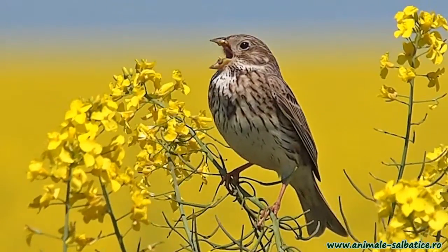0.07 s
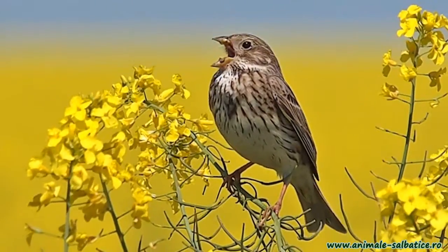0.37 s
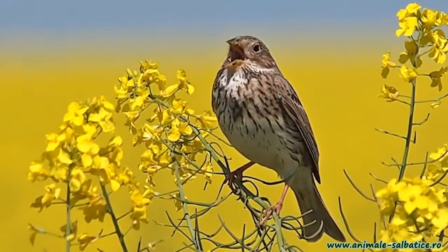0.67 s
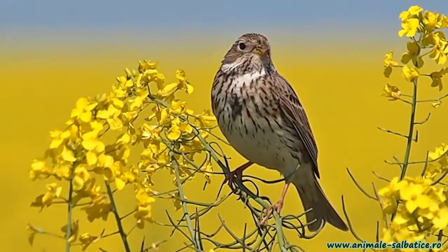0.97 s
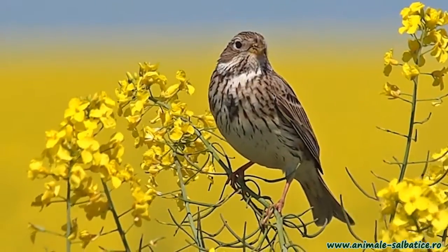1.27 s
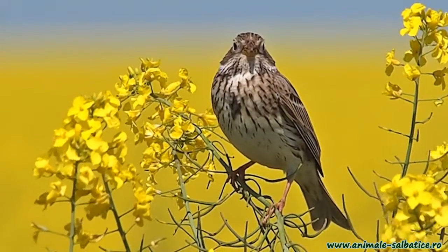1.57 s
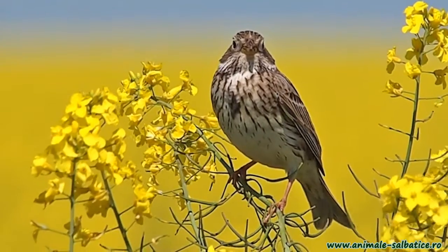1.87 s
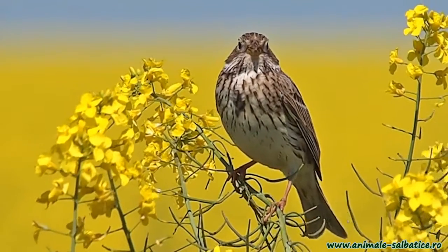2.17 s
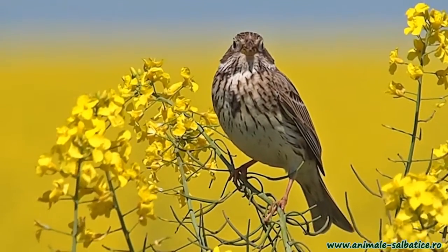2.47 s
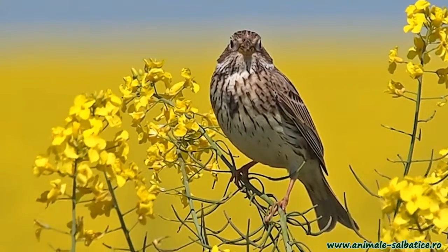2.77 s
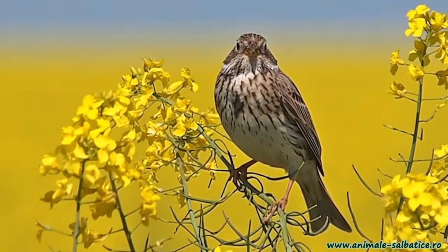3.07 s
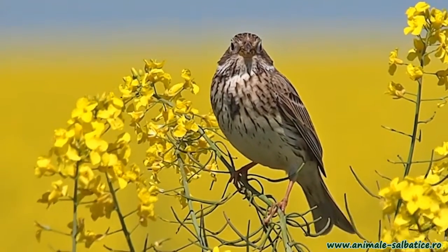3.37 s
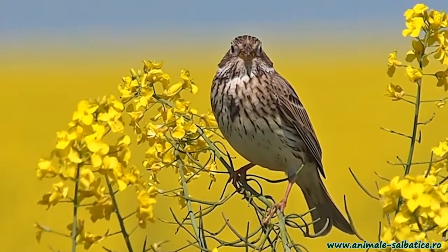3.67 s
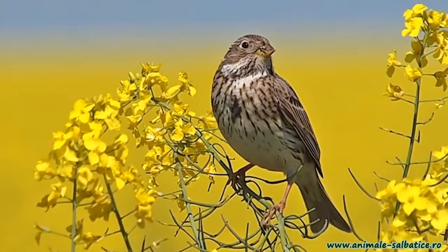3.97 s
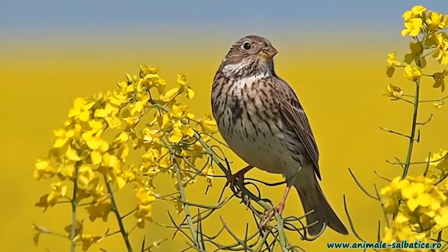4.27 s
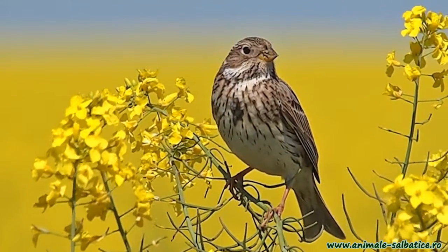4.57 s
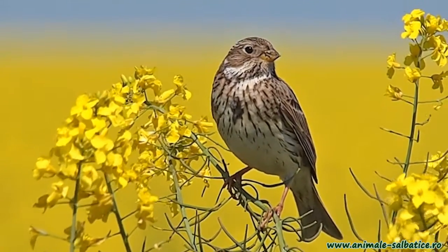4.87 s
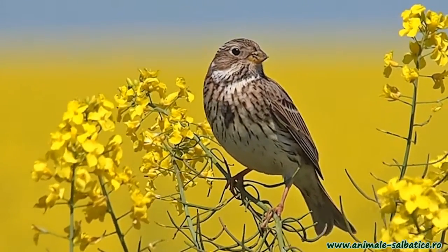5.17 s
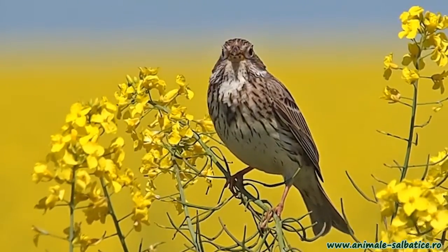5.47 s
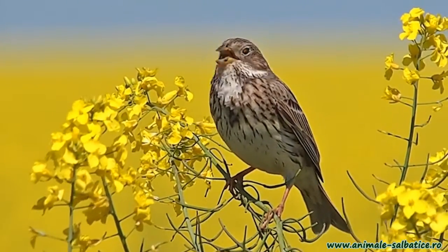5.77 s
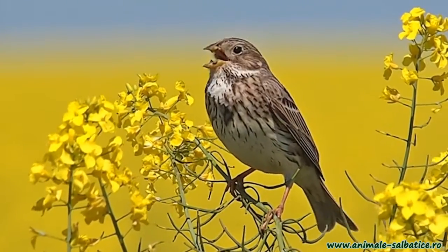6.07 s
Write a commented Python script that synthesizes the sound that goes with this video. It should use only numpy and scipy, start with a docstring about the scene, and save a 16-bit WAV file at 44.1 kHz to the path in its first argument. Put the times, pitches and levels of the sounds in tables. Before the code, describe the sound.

A small bird sings a brief jangling rattle, rests, then gives sharp ticks over faint wind, hiss and distant birds.

```python
"""A jangling rattle: a corn bunting on a flower stalk ends its song, rests, and restarts with sharp ticks.
Each note is one quick pitch gesture of the syrinx; flower heads and the crop scatter it back.
Low wind and microphone hiss lie under the open field. Far birds whistle, something knocks softly
nearby, and one hoarse far call rises near the end."""
import sys
import numpy as np
from scipy import signal
from scipy.fft import rfft, irfft
from scipy.io import wavfile
from scipy.ndimage import uniform_filter1d

SR = 44100
rng = np.random.default_rng(int(sys.argv[2]) if len(sys.argv) > 2 else 0)


def transcribe(signal):
    """Save signal, clipped to [-1, 1], as a 16-bit WAV file at the path in sys.argv[1]."""
    frames = np.atleast_2d(signal).T
    limited = np.clip(frames, -1, 1)
    pcm = np.round(limited * 32767).astype(np.int16)
    wavfile.write(sys.argv[1], SR, pcm)


N = 278712

# syrinx gestures by name, per side: share of note length, f/Hz, level/dB, flutter depth 0-1
UPPER_SIDE = { "fall": [(0, 8620, -30, 0.06), (.12, 7640, -13, 0), (.27, 7120, 0, 0.06),
              (.52, 6820, -2, 0.08), (.65, 6170, -9, 0.08), (.76, 5480, -7.5, 0), (.9, 5160, -18.5, 0),
              (1, 5160, -25.5, 0)], "slide": [(0, 8600, -22, 0), (.07, 7950, -10, 0), (.18, 7550, -7, 0),
              (.32, 7230, 0, 0), (.52, 6700, -11, 0.2), (.65, 6020, -18, 0.06), (.76, 5500, -10, 0.1),
              (.92, 5400, -19, 0.1), (1, 5300, -30, 0.02)], "rise": [(0, 6900, -11, 0), (.38, 7060, -5, 0),
              (.62, 7400, -1, 0.03), (.8, 7800, -5, 0.2), (1, 8100, -22, 0.1)], "hook": [(0, 6530, -16, 0),
              (.25, 6920, -5.5, 0.04), (.48, 7200, 1.5, 0.17), (.7, 8100, -4, 0.15), (1, 8170, -12.5, 0)],
              "drop": [(0, 7800, -13, 0), (.2, 6920, -1, 0), (.55, 6680, 0, 0), (.75, 6000, -10.5, 0),
              (1, 4940, -21, 0.04)], "twine": [(0, 5300, -17, 0), (.12, 6200, -6, 0), (.22, 7130, 0, 0.05),
              (.45, 7320, -0.5, 0.14), (.62, 7800, -5, 0.13), (.8, 7960, -21.5, 0), (1, 8270, -8, 0)],
              "scrape": [(0, 7700, -10, 0.04), (.25, 6650, -1, 0), (.5, 5780, -1, 0),
              (.75, 5330, -6.5, 0.1), (1, 5200, -8, 0)], "clink": [(0, 8460, -21, 0), (.13, 7550, -13, 0),
              (.3, 7150, 0.5, 0), (.5, 6840, -3, 0), (.7, 6600, -14.5, 0.1), (1, 6500, -44, 0)],
              "low": [(0, 5660, -5, 0.02), (.35, 5330, -1, 0), (.7, 5160, -3, 0.1), (1, 5200, -10, 0.1)],
              "buzz": [(0, 5730, -18, 0.75), (.3, 5520, -5, 0.7), (.7, 5630, -5.5, 0.44),
              (.88, 5350, -4, 0.6), (1, 5060, -15.5, 0.3)], "lisp": [(0, 5320, -15, 0.5),
              (.15, 5460, -1.5, 0.47), (.35, 5260, -0.5, 0.43), (.55, 4920, -0.5, 0.13),
              (.8, 4680, -2.5, .04), (.92, 4750, -0.5, 0.08), (1, 4750, -18, 0.1)],
              "tick": [(0, 4000, -14, 0.1), (.12, 5600, -26, 0), (.21, 6770, -3, 0.12),
              (.35, 7210, 0.5, 0.07), (.62, 7230, -5, 0), (.8, 7580, -12.5, 0.04), (1, 8170, -16, 0.1)],
              "chip": [(0, 3900, -11, 0), (.25, 5160, -16, 0.1), (.5, 5620, 2, 0.07), (.66, 6130, 1.5, 0.2),
              (.77, 4000, -1, 0), (.9, 3000, -10.5, 0), (1, 2450, -10, 0)], "sigh": [(0, 5800, -6, 0),
              (.08, 5300, 6.5, 0), (.25, 4730, -3, 0), (.5, 4580, -1, 0), (.85, 4550, -1, 0),
              (1, 4550, -12, 0)], "whit": [(0, 5170, -21, 0), (.4, 4770, -11, 0), (.7, 5800, 2.5, 0),
              (1, 6250, -21, 0.07)], }
LOWER_SIDE = { "fall": [(0, 5700, -42, 0.004), (.25, 5370, -32, 0), (.5, 5280, -25, 0),
              (.7, 5340, -34, 0.0021)], "clink": [(0, 5800, -44, 0), (.35, 5590, -24, 0),
              (.65, 5460, -13, 0), (.85, 5250, -17, 0), (1, 4960, -23, 0)], "hook": [(0, 5700, -22, 0),
              (.25, 5420, -19.5, 0), (.55, 5160, -30, 0), (1, 5150, -47, 0)], "drop": [(0, 5480, -27, 0),
              (.4, 5140, -22, 0), (1, 4820, -40, 0)], "twine": [(0, 4800, -32, 0), (.25, 4750, -23, 0),
              (.52, 4470, -17, 0), (.78, 5050, -13, 0.01), (1, 5400, -24, 0.0025)], }
# t/s, notes, first gap/s, gap ratio, length/s, gesture, pitch factor, first and last level/dB, rasp 0-1
TRILLS = [ (.0066, 5, .0138, 1.025, 0.012, "clink", 1.01, -14, -8.5, 0.11),
          (.099, 6, .0073, .97, 0.008, "scrape", .96, -25, -17, 0.56),
          (0.1788, 3, .012, 1.02, .014, "clink", 1, -14.5, -9, 0.18),
          (0.2619, 4, .011, .93, .0105, "drop", .99, -9.5, -14, 0.39),
          (0.3453, 2, 0.015, 1, 0.014, "clink", 1.015, -13, -15, 0.06),
          (0.4368, 3, 0.014, 1, 0.0096, "hook", 0.97, -11.5, -12, 0.17),
          (.4805, 2, .0125, 1, .01, "low", 1.03, -18.5, -22, 0.13),
          (.5765, 9, .013, .995, .013, "twine", 1.005, -16.5, -19, .26),
          (0.714, 3, .0278, 1.08, .026, "slide", 1.004, -14.5, -13.5, 0.21), ]
# notes between trills, two more after the rest: t/s, length/s, gesture, pitch factor, level/dB, rasp 0-1
SINGLE_NOTES = [ (.0796, .012, "rise", 1, -8, 0.12), (.1525, .01, "buzz", 1, -12, 0.2),
                (.158, 0.0087, "hook", 0.94, -8, 0.3), (.1735, .009, "clink", 1.14, -20, .5),
                (.2255, .0095, "buzz", .98, -15.5, .8), (.2395, .017, "fall", 1, -8, 0),
                (.312, 0.012, "low", 1.01, -21.5, 0.2), (.329, 0.0087, "hook", 1, -12, 0.2),
                (.3400, 0.008, "low", 1.02, -22, 0.06), (.3727, 0.015, "fall", 0.99, -9, .07),
                (.42, 0.013, "rise", 1.01, -14, .1), (.5022, .014, "fall", 1.015, -9, .1),
                (.5470, 0.016, "rise", 1.02, -14.5, 0.05), (.566, 0.0086, "hook", 0.96, -14.5, .3),
                (.6926, .019, "slide", .975, -16, 0.44), (5.4006, 0.039, "sigh", .99, -50.5, .3),
                (5.4575, .010, "whit", 1.01, -32.5, .05), ]
# start of the next song: t/s, wait for tick/s, pitch factor, lisp level/dB, tick level/dB
OPENERS = [(5.784, 0.066, 0.94, -35, -14), (5.984, .0658, 0.96, -28.5, -11), (6.145, .063, 1, -26, -7),
           (6.276, .062, 1, -26, -10)]
# filters for main tones (throat and beak), octaves, sum and difference tones: f/Hz, level/dB
THROAT_EQ = [(2800, -14), (3700, -4.5), (4500, -2.5), (5500, 0.5), (6300, -3.5), (7000, .5), (8100, 0),
             (8800, -6.5)]
OCTAVE_EQ = [(1500, -90), (6000, -26), (9500, -10), (11000, -25), (14000, -24), (16000, -28)]
MIXED_TONE_EQ = [(1200, -70), (2600, -8), (3500, -30), (10000, -26), (12000, -3.5), (14000, -18)]

# flower-head echoes: delay/s, level/dB
FLOWER_ECHOES = [(.0024, -25), (.0047, -13.5), (0.0107, -19.5)]
# crop scatter: delay/s, t60/s, level/dB
CROP_TAILS = [(.003, 0.07, -10.5), (0.011, 0.25, -17)]
# its colour: f/Hz, level/dB
CROP_EQ = [(4200, -2), (5300, -5), (6200, -9), (7200, 1), (8300, -1.5)]

# spectra of wind with far rumble, and of microphone hiss: f/Hz, level/dB
AIR_SPECTRUM = [(12, -35.5), (25, -11), (50, 0), (105, -1.5), (220, -7), (450, -12.5), (850, -16),
                (2000, -20.5), (3000, -23), (4200, -29), (5200, -38), (9000, -56)]
HISS_SPECTRUM = [(3000, -28), (5000, -18), (6300, -9.5), (8000, -5), (10500, -1.5), (13500, 0.5),
                 (15500, 1.5), (16500, -5)]
# wind rumble, used relative to its median: t/s, level/dB
GUSTS = [(0.0, -50), (0.67, -52), (0.69, -49), (1.04, -52), (1.51, -51.5), (1.53, -49), (1.83, -52),
         (2.04, -47.5), (2.16, -50), (2.69, -50), (2.94, -53), (3.29, -50), (3.86, -52), (3.94, -47),
         (3.99, -55.5), (4.08, -43.5), (4.15, -51), (6.32, -49.5)]

# far whistles: t/s, length/s, start f/Hz, middle f/Hz, end f/Hz, level/dB, blur/Hz, warble depth/Hz
FAR_WHISTLES = [ (1.25, .21, 2780, 2810, 2800, -67.5, 54, 81.5), (2.28, .1, 3900, 3450, 3050, -63, 160, -2),
                (3.13, 0.14, 2720, 2910, 2790, -65, 22, 0), (3.21, .23, 2940, 2630, 2580, -64, 25, 0),
                (3.41, .16, 3340, 3290, 3250, -66, 200, 0), (3.93, 0.083, 2410, 2940, 3620, -62.5, 200, 0),
                (4.03, 0.27, 2810, 2800, 2700, -61.5, 90, 93), (4.48, .19, 3710, 3320, 2600, -64, 200, 0),
                (5.07, .11, 3000, 2930, 2770, -58.5, 140, 152),
                (5.525, 0.031, 1540, 1560, 1540, -56, 50, 0), ]

# soft knocks: t/s, level/dB
KNOCKS = [(1.744, -24), (2.008, 0), (3.453, -15.5), (4.314, -18.5)]
# resonances of knock and dry tap: f/Hz, level/dB, width/Hz, t60/s
KNOCK_MODES = [(304.6, -36, 160, 0.27), (420, -33.5, 190, 0.21), (962, -44.5, 220, .14),
               (1493, -44, 1040, 0.14)]
TAP_MODES = [(1680, -30.5, 150, 0.015), (2000, -33, 2600, 0.0089)]

# hoarse call: t/s, f/Hz, level/dB
HOARSE_CONTOUR = [(5.63, 795, -68), (5.69, 798, -57.5), (5.76, 790, -65.5), (5.835, 810, -50.5),
                  (5.919, 877, -49.5), (5.975, 912, -53.5), (6.02, 910, -69.5)]
# its partials: harmonic number, level/dB, blur/Hz
HOARSE_PARTIALS = [(1, -4.5, 250), (2, -0.5, 130)]
# its rush of noise: f/Hz, level/dB
RUSH_SPECTRUM = [(300, -25), (700, -1), (1300, -3), (1800, -8), (2300, -18)]


def gain_of(db):
    """Decibels to amplitude."""
    return 10 ** (np.asarray(db) / 20)


def unit_rms(x):
    """Scales to rms 1."""
    return x / np.sqrt(np.mean(x ** 2) + 1e-20)


def add(mix, start_s, sound):
    """Mixes a sound in at start_s."""
    part = mix[max(round(start_s * SR), 0):][:len(sound)]
    part += sound[:len(part)]


def coloured(x, eq):
    """Filters x by a table of f/Hz, level/dB."""
    hz, db = np.transpose(eq)
    bin_hz = np.fft.rfftfreq(2 * N, 1 / SR)
    response = gain_of(np.interp(np.log(bin_hz + 1), np.log(hz), db))
    return irfft(rfft(x, 2 * N) * response)[:N]


def noise(spectrum):
    """Coloured noise, rms 1."""
    return unit_rms(coloured(rng.standard_normal(N), spectrum))


def drift(width_hz, size=16384):
    """Complex low-pass noise, rms 1."""
    hz = np.fft.fftfreq(size, 1 / SR)
    wander = np.fft.ifft(np.exp(2j * np.pi * rng.random(size)) / (1 + (hz / width_hz) ** 4) ** .5)
    return wander / np.sqrt(np.mean(abs(wander) ** 2))


def envelope(x):
    """Running rms over about 1 ms."""
    return np.sqrt(np.convolve(x ** 2, signal.windows.hann(89) / 44, "same") + 1e-12)


def trill(start_s, count, gap_s, gap_ratio, length_s, gesture, pitch, first_db, last_db, rasp):
    """Note rows: one gesture repeats, pace and level changing evenly."""
    onsets_s = start_s + np.cumsum(np.r_[0, gap_s * gap_ratio ** np.arange(count - 1)])
    levels_db = np.linspace(first_db, last_db, count)
    return [(at_s, length_s, gesture, pitch, db, rasp) for at_s, db in zip(onsets_s, levels_db)]


def membrane(contour, length_s, pitch, rasp, flutter_hz=228, flutter_swing=.11, rasp_hz=800):
    """One side of the syrinx sings a gesture: a pure tone that can tremble or rasp."""
    t = np.arange(0, length_s, 1 / SR)
    share, *columns = np.transpose(contour)
    hz, db, flutter = (uniform_filter1d(np.interp(t / length_s, share, c), size=30) for c in columns)
    tremble_rad = 2 * np.pi * flutter_hz * t
    jitter = drift(rasp_hz)[:len(t)]
    hz = hz * pitch * (1 - flutter_swing * flutter * np.sin(tremble_rad) + .128 * rasp * jitter.real)
    # loudest on each upswing of the tremble
    pulsing = 1 - np.clip(1.53 * flutter, 0, .9) * (1 + np.cos(tremble_rad)) / 2
    roughness = 1 + .5 * rasp * jitter.imag
    amplitude = gain_of(db) * pulsing * roughness * signal.windows.tukey(len(t), .08)
    return amplitude * np.sin(2 * np.pi * np.cumsum(hz) / SR)


def syrinx_side(gestures):
    """All notes that one side takes part in."""
    phrases = [SINGLE_NOTES] + [trill(*row) for row in TRILLS] + [opener(*row) for row in OPENERS]
    out = np.zeros(N)
    for phrase in phrases:
        for start_s, length_s, gesture, pitch, db, rasp in phrase:
            if gesture in gestures:
                add(out, start_s, gain_of(db) * membrane(gestures[gesture], length_s, pitch, rasp))
    return out


def bunting(lower_octave_db=9):
    """Two syrinx sides share one airflow: each adds its octave, both make sum and difference tones."""
    upper, lower = syrinx_side(UPPER_SIDE), syrinx_side(LOWER_SIDE)
    # dividing by the envelope keeps the products in step with the level
    octaves = upper ** 2 / envelope(upper) + gain_of(lower_octave_db) * lower ** 2 / envelope(lower)
    mixed = upper * lower / envelope(upper + lower)
    return coloured(upper + lower, THROAT_EQ) + coloured(octaves, OCTAVE_EQ) + coloured(mixed, MIXED_TONE_EQ)


def field(song):
    """Direct song, distinct echoes off near flower heads, a short diffuse tail from the crop."""
    t = np.arange(SR // 2) / SR
    near, tail = np.zeros(len(t)), np.zeros(len(t))
    near[0] = 1
    for delay_s, db in FLOWER_ECHOES:
        add(near, delay_s, gain_of([db]))
    for delay_s, t60_s, db in CROP_TAILS:
        scatter = rng.standard_normal(len(t)) * np.exp(-np.log(1000) * t / t60_s)
        add(tail, delay_s, gain_of(db) * scatter / np.linalg.norm(scatter))
    return (signal.fftconvolve(song, near) + signal.fftconvolve(coloured(song, CROP_EQ), tail))[:N]


def wind_and_hiss(air_db=-49, hiss_db=-50.5, gust_edge_hz=330):
    """Wind swells in the bass under steady air noise and microphone hiss."""
    times_s, db = np.transpose(GUSTS)
    gust = gain_of(np.interp(np.arange(N) / SR, times_s, db - np.median(db)))
    air = gain_of(air_db) * noise(AIR_SPECTRUM)
    bass = signal.sosfiltfilt(signal.butter(2, gust_edge_hz, fs=SR, output="sos"), air)
    return air + (gust - 1) * bass + gain_of(hiss_db) * noise(HISS_SPECTRUM)


def far_chirps(rate_per_s=2.8, length_s=.048, centre_hz=3254, db=-66.5, blur_hz=110):
    """Whistle rows: short faint glides at random times."""
    rows = []
    for when, height, tilt in rng.random((round(rate_per_s * N / SR), 3)):
        hz = centre_hz * (1 + .05 * (2 * height - 1))
        glide_hz = hz * .045 * (2 * tilt - 1)
        rows.append((when * N / SR, length_s, hz - glide_hz, hz, hz + glide_hz, db, blur_hz, 0))
    return rows


def far_birds(warbles_per_s=27):
    """Faint arched whistles and chirps, blurred on the way across the field."""
    out = np.zeros(N)
    whistles = list(FAR_WHISTLES) + far_chirps()
    for start_s, length_s, start_hz, middle_hz, end_hz, db, blur_hz, warble_hz in whistles:
        position = np.linspace(-1, 1, int(length_s * SR))
        slope_hz = (end_hz - start_hz) / 2
        arch_hz = (start_hz + end_hz) / 2 - middle_hz
        hz = middle_hz + position * slope_hz + position ** 2 * arch_hz
        hz += warble_hz * np.sin(np.pi * warbles_per_s * length_s * position)
        whistle = (drift(blur_hz / 2)[:len(hz)] * np.exp(2j * np.pi * np.cumsum(hz) / SR)).real
        add(out, start_s, gain_of(db) * unit_rms(whistle) * signal.windows.tukey(len(hz), .5))
    return out


def struck(modes, rise_s=.00096):
    """A blow rings broad, damped resonances."""
    out = 0
    for hz, db, width_hz, t60_s in modes:
        blur = drift(width_hz / 2)
        t = np.arange(len(blur)) / SR
        decay = (1 - np.exp(-t / rise_s)) * np.exp(-np.log(1000) * t / t60_s)
        ring = (blur * np.exp(2j * np.pi * hz * t)).real * decay
        out += gain_of(db) * ring * np.linalg.norm(decay) / np.linalg.norm(ring)
    return out


def knocks(tap_at_s=3.6445):
    """Dull knocks on one object, and one small dry tap."""
    out = np.zeros(N)
    for start_s, db in KNOCKS:
        add(out, start_s, gain_of(db) * struck(KNOCK_MODES))
    add(out, tap_at_s, struck(TAP_MODES))
    return out


def hoarse_call(rush_db=-1.5):
    """A far animal, perhaps a large bird: two blurred partials rise in a rush of noise."""
    times_s, hz, db = np.transpose(HOARSE_CONTOUR)
    t = np.arange(N) / SR
    phase_rad = 2 * np.pi * np.cumsum(np.interp(t, times_s, hz)) / SR
    voice = np.zeros(N)
    for harmonic, partial_db, blur_hz in HOARSE_PARTIALS:
        partial = (drift(blur_hz / 2, size=N) * np.exp(1j * harmonic * phase_rad)).real
        voice += gain_of(partial_db) * unit_rms(partial)
    amplitude = np.interp(t, times_s, gain_of(db), left=0, right=0)
    return amplitude * (voice + gain_of(rush_db) * noise(RUSH_SPECTRUM))


def opener(start_s, wait_s, pitch, lisp_db, tick_db, chip_db=-22.5):
    """Note rows: a soft trembling lisp, a wait, a sharp tick, then at once a lower chip."""
    lisp_s, tick_s, chip_s = .05, .018, .012
    lisp_rasp, tick_rasp, chip_rasp = .2, .083, .42
    tick_pitch = pitch ** .5  # half the lisp's pitch shift
    return [(start_s, lisp_s, "lisp", pitch, lisp_db, lisp_rasp),
            (start_s + wait_s, tick_s, "tick", tick_pitch, tick_db, tick_rasp),
            (start_s + wait_s + tick_s, chip_s, "chip", tick_pitch, chip_db, chip_rasp)]


def scene():
    """The near bird in its field, plus surroundings; mono."""
    return (field(bunting()) + far_birds() + hoarse_call() + knocks() + wind_and_hiss())[None]


def record(dry):
    """Low-pass band limit."""
    edge_hz = 15830
    lowpass = signal.firwin(511, edge_hz, window=("kaiser", 9), fs=SR)
    return signal.oaconvolve(dry, lowpass[None], "same")


dry = scene()
out = record(dry)
transcribe(out)
```